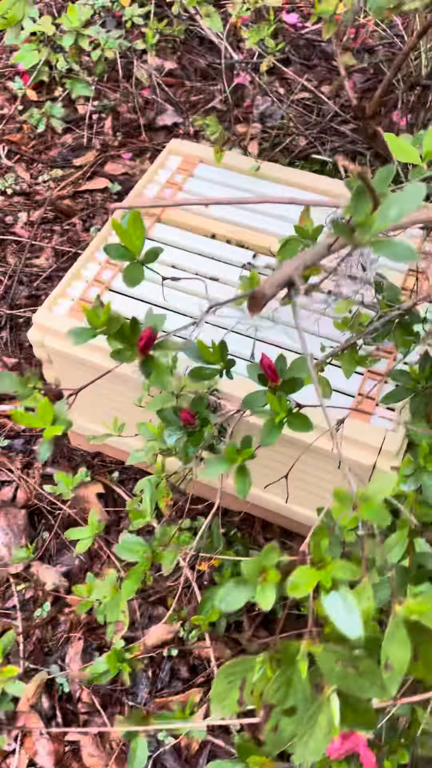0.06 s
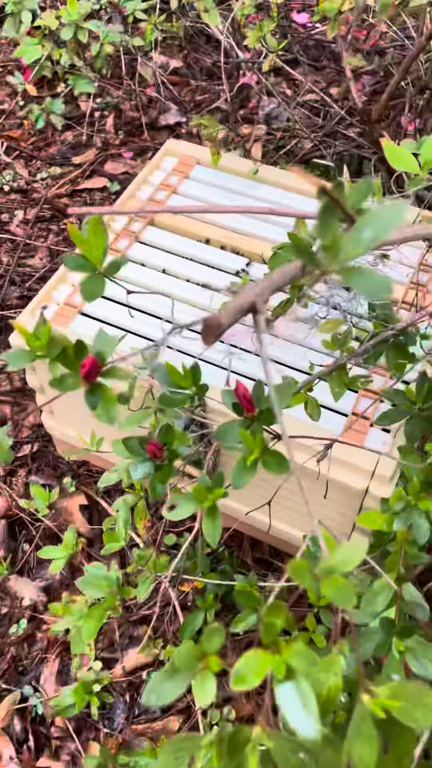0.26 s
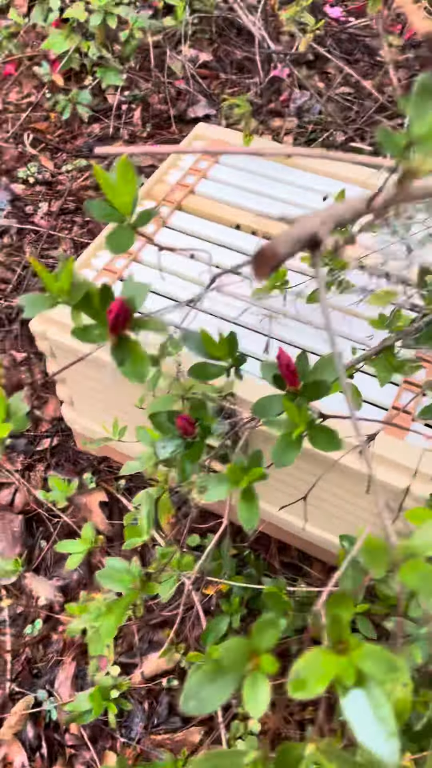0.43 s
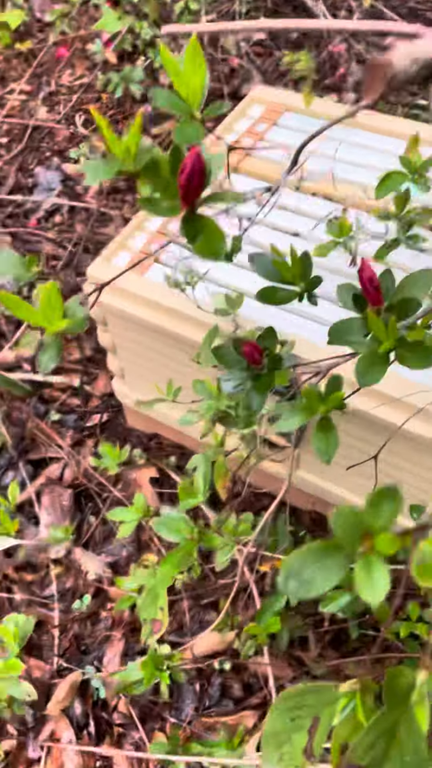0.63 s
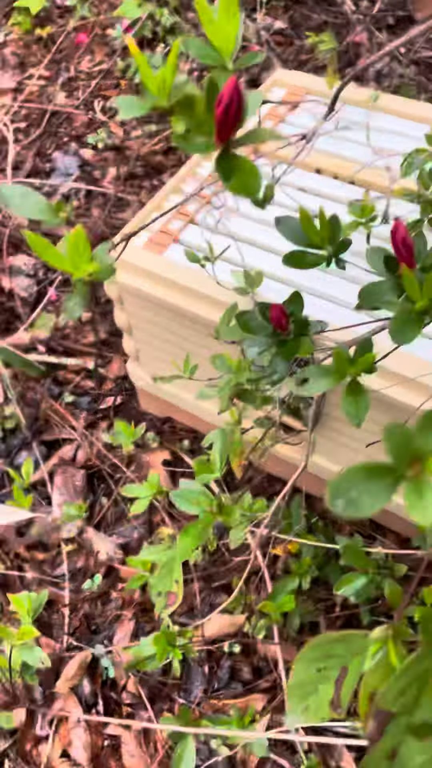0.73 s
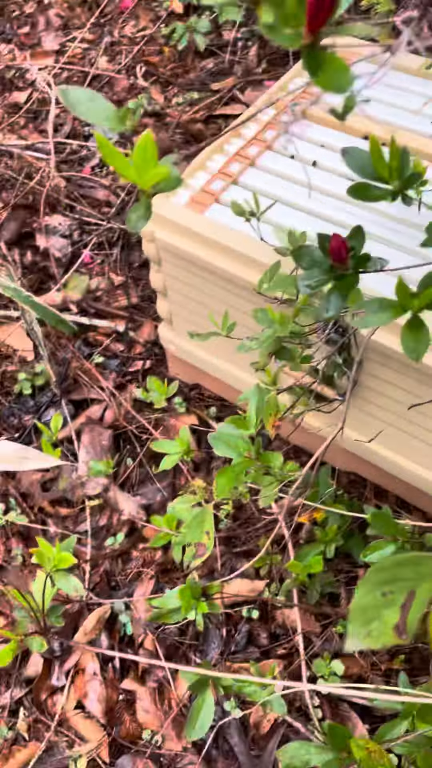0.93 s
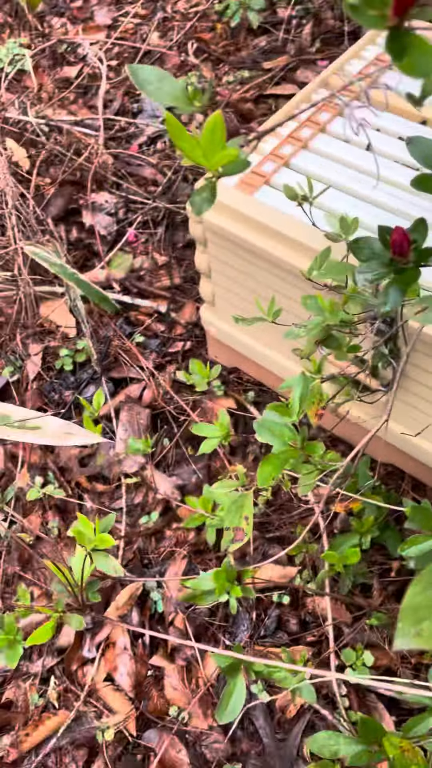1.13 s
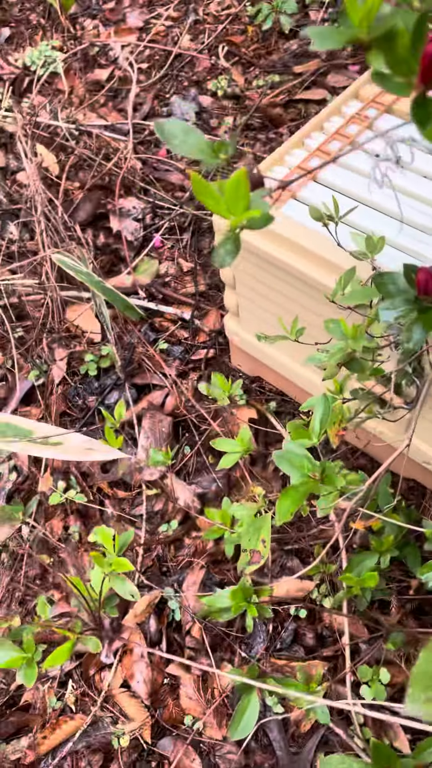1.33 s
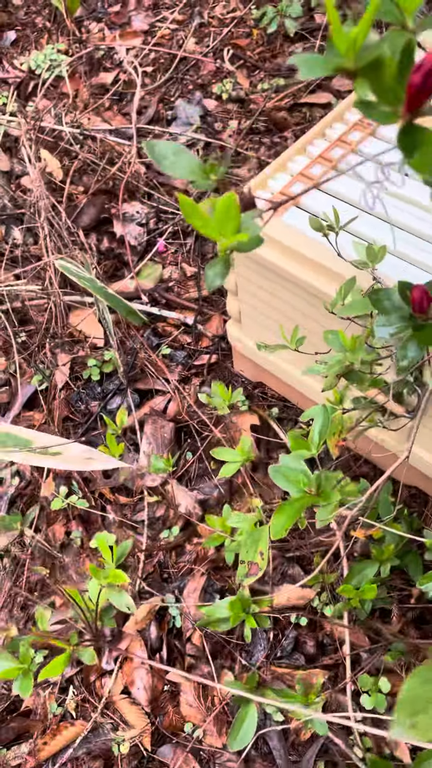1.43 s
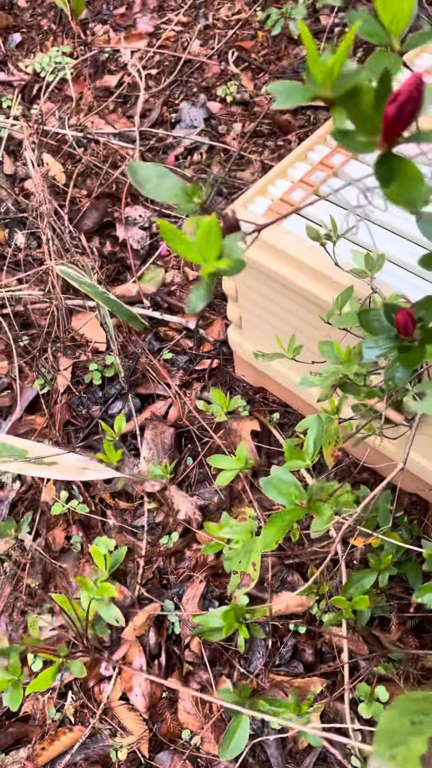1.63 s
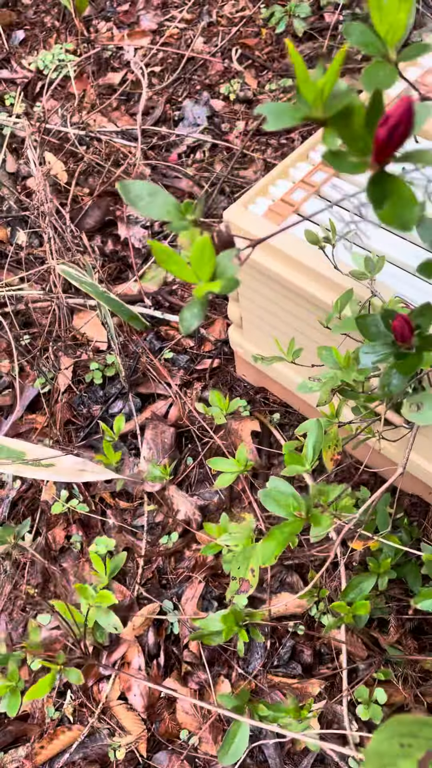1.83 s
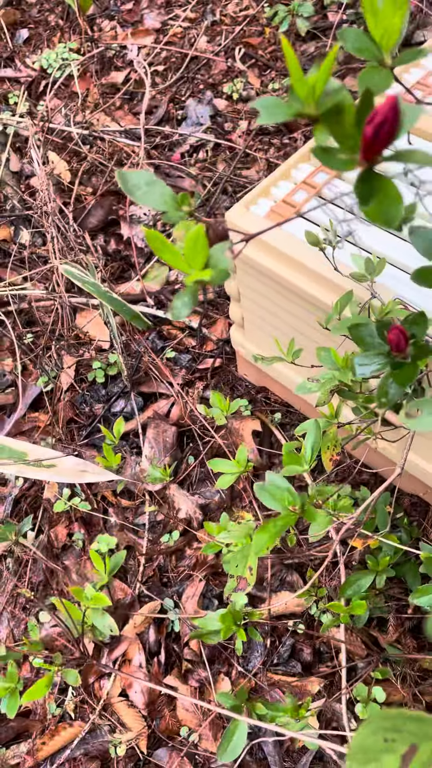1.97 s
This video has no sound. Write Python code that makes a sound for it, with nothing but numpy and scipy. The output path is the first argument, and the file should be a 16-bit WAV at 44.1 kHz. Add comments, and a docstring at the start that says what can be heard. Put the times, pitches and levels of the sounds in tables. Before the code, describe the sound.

Close stereo microphone in a shrubbery: quick, rough bee passes around 240 hertz, loudest before one second, over soft leaf hiss and tiny twig snaps. Hard clicking blows and air puffs come just after one second, then shorter buzzes and puffs. From three seconds it thins to distant swarm, rumble, soft bumps and thin bird slurs; a close wavering hover returns before a final battering at 5.3 seconds.

```python
"""Honeybees fly round a hive box in a shrubbery, among brushed leaves and snapping twigs.
At first one after another swoops past the microphone: each wingbeat hums, buzzes and slaps, swelling with nearness.
Just after one second, air puffs, knocks and wing tips hit the microphone hard; more passes and puffs follow.
From three seconds a far bird whistles short slurs; then bees hover close and weave, and at 5.3 s the blows return.
Under it all lie the hum of the swarm, the hiss of foliage and a low outdoor rumble with a wavering drone."""
import sys
import numpy as np
from scipy import signal
from scipy.fft import rfft, irfft, next_fast_len
from scipy.io import wavfile
from scipy.ndimage import map_coordinates

SR = 44100
rng = np.random.default_rng(int(sys.argv[2]) if len(sys.argv) > 2 else 0)


def generate_wav(signal):
    """Clip the signal to [-1, 1] and save it as 16-bit WAV at the path in sys.argv[1]."""
    frames = np.transpose(np.atleast_2d(signal))
    scaled = np.clip(frames, -1, 1) * 32767
    pcm = np.round(scaled).astype(np.int16)
    wavfile.write(sys.argv[1], SR, pcm)


N = 258293
T = np.arange(N) / SR  # time of every sample, seconds
FFT_SIZE = next_fast_len(N)
FREQS = np.arange(FFT_SIZE // 2 + 1) * SR / FFT_SIZE
LEFT_RIGHT = np.array([[1], [-1]])  # opposite signs for the two channels


def amp(db):
    """Turn decibels into gain."""
    return np.exp(np.asarray(db) * np.log(10) / 20)


def unit(x):
    """Scale to an rms level of 1."""
    return x / np.sqrt(np.mean(x ** 2))


def curves(table, t=T):
    """Join the columns of a table by straight lines in time."""
    s, *columns = np.transpose(table)
    return [np.interp(t, s, column) for column in columns]


def along_hz(points, hz=FREQS):
    """Join (Hz, value) points along a log-frequency axis."""
    f, value = np.transpose(points)
    return np.interp(np.log(hz + 1), np.log(f), value)


def colour(x, points):
    """Filter a sound by a list of (Hz, dB) points."""
    return irfft(rfft(x, FFT_SIZE) * amp(along_hz(points)), FFT_SIZE)[..., :N]


def walk(rate):
    """Random wandering: a new chance value `rate` times a second, joined by lines, with a spread near 1."""
    knots = np.arange(0, T[-1] + 1, 1 / rate)
    return np.interp(T, knots, rng.standard_normal(len(knots)))


def swell(s, length):
    """A bell-shaped rise and fall round time s."""
    return np.exp(-2 * ((T - s) / length) ** 2)


def spread(pair, side_db):
    """Use two unrelated signals as the middle and side of a stereo pair."""
    middle, side = pair
    return middle + amp(side_db) * side * LEFT_RIGHT


# Each row: start in seconds (middle of the pass), approach in seconds, linger in seconds,
# leave in seconds, wingbeat in Hz, slide of the wingbeat to either side in Hz,
# hum at the nearest point in dB, then octave, buzz and slap in dB over the hum (all before later trims),
# tilt of the buzz in dB per octave, strongest part of the buzz in Hz,
# and roughness of the flight (about 0.5 smooth, 1 or more rough).
BEE_PASSES = [ (0.104, 0.077, 0.097, .2, 243, -6, -46.5, -0.5, -5, -19, -17, 1094, 1.04),
              (0.303, 0.025, 0.018, .07, 240, 14.5, -30, -6.5, -11, -27.5, -5.5, 900, 1.01),
              (0.495, .035, 0.16, 0.018, 226, 2, -26.5, -4, -8, -28.5, -3.5, 748, 0.78),
              (0.619, 0.027, 0, 0.035, 235.1, -10.5, -12, 1.5, -5, -28, -2, 780, 0.78),
              (0.694, 0.025, 0.012, .019, 237.6, -8, -10, 0, -11, -36, 1.5, 703, 0.78),
              (0.769, 0.022, 0.0094, 0.015, 256.8, 9, -37, 1.5, 0.5, -16, -3, 796, 0.77),
              (0.905, 0.044, 0.0088, .1, 231, 3, -27.5, -12.5, -13.5, -36, -3, 990, 1.25),
              (1.027, 0.072, 0.062, .09, 253.8, 2, -34, 3.5, -7, -29, 1.5, 1200, 1.03),
              (1.125, 0.044, 0.008, 0.031, 240.8, 5, -21.5, -0.5, -3.5, -26, -4, 730, 0.88),
              (1.289, 0.037, 0.015, .014, 247.8, 0, -22, -2.5, -4, -21.5, 1, 690, 0.74),
              (1.308, 0.0062, 0.014, 0.0071, 246.8, 0.5, -10, -8, -3.5, -21.5, 1.5, 1010, 0.73),
              (1.58, 0.042, 0.25, 0.12, 235.2, 1, -46, -7.5, -4.5, -6.5, -10, 1080, 0.93),
              (1.828, 0.06, 0, 0.0418, 245, 8, -34, -13, -4.5, -20.5, 1, 1090, 0.77),
              (1.913, 0.024, 0.0021, 0.016, 241.2, -2, -25, -8, -8.5, -21.5, 3.5, 1030, 1),
              (1.969, 0.0056, 0.012, 0.055, 252.9, -3, -35, -0.5, 1, -15, -4, 940, 0.79),
              (2.076, 0.036, 0, 0.022, 259.2, 3, -27, -5.5, -5.5, -20, 0, 845, 0.91),
              (2.116, .012, 0.012, 0.023, 243.1, -3.5, -22.5, -3, -5.5, -22.5, -1.5, 900, 1.06),
              (2.222, 0.0478, 0.0058, 0.069, 226.9, -3, -36, -7, -3, -21.5, -2, 1190, 0.68),
              (2.298, 0.014, 0.009, 0.014, 230, 7, -24.5, -0.5, 0.5, -19.5, 4.5, 1200, 0.65),
              (2.35, 0.031, 0.023, 0.024, 252.5, 9, -42.5, -16, 7.5, -6.5, 1.5, 1060, 0.72),
              (2.405, 0.025, 0.044, 0.029, 257, -3.5, -42.5, -10, 5.5, -8.5, 0.5, 1060, 0.87),
              (2.492, 0.028, 0, 0.026, 252.5, -8, -33, 2, 6.5, -11.5, 2, 815, 0.86),
              (2.765, 0.066, 0.04, .034, 247, -4, -31.5, -6, -8.5, -21.5, 5.5, 1140, 0.69),
              (3.147, 0.044, 0.049, 0.027, 243, -4, -44, -6, -8, -10, 4, 1190, 0.8),
              (4.411, .05, 0.00052, 0.051, 250, -6, -41, -1.5, -5, -23, 1, 1120, .5),
              (4.781, .046, 0.0079, 0.11, 244.3, -4, -39, 4, -5, -22, 6, 1200, .5),
              (4.9, .036, 0.079, 0.025, 227.2, 0, -22.5, -3, -8.5, -24, 4.5, 1090, 0.79),
              (5.005, .025, .065, 0.035, 227.4, 0, -22, -4.5, -8.5, -28.5, 3.5, 1160, 0.55),
              (5.119, 0.04, 0.095, 0.016, 241.5, 2, -22, -4.5, -12, -30.5, -0.5, 1080, 0.5),
              (5.222, 0.026, 0.02, 0.022, 236.2, -5, -30, 8, 5, -19, -1.5, 750, 0.77),
              (5.316, 0.0073, 0.014, 0.0075, 244.1, -5.5, -17, -0.5, 1, -20.5, 0, 910, 0.82),
              (5.356, 0.063, 0.052, 0.013, 240.5, -0.5, -27, 2.5, -5.5, -20, -5, 820, .95)]
# The powers of distance with which hum, octave, buzz and slap fade, in that order (no unit).
DISTANCE_POWERS = [3.0, 2.88, 2.5, 1.4]
# How the long hovers weave about their pitch. Each row: time in seconds, shift of the wingbeat in Hz.
HOVER_WEAVE = [(.36, 0), (.39, 5), (.425, -7), (.46, 2), (.5, 0), (4.62, 0), (4.68, 8.5), (4.746, -5.5),
               (4.79, -0.5), (4.825, 6.5), (4.888, -8.5), (4.928, 6), (4.972, -10.5), (5.03, 3.5),
               (5.08, -0.5), (5.145, 2), (5.17, -0.5), (5.2, -0.5)]
SLIDE_S = 0.02  # added to half the linger to set how fast the wingbeat slides


def flight():
    """Passes swell and fade with distance; the nearest bee sets the wingbeat, buzz colour and roughness."""
    power, steer = np.zeros((4, N)), np.zeros((4, N))
    for (s, approach, linger, leave, hz, slide_hz, hum_db, octave_db, buzz_db, slap_db,
         tilt_db, focus_hz, rough) in BEE_PASSES:
        t = T - s
        coming = np.minimum(t + linger / 2, 0) / approach
        going = np.maximum(t - linger / 2, 0) / leave
        distance_db = 10 * np.log10(1 + (coming + going) ** 2)
        over_hum = [0, octave_db, buzz_db, slap_db]
        layers = [amp(hum_db + db - fall * distance_db) ** 2 for db, fall in zip(over_hum, DISTANCE_POWERS)]
        power += layers
        pitch = hz + slide_hz * np.tanh(t / (linger / 2 + SLIDE_S))
        # the louder the hum of a bee, the more it decides
        steer += [layers[0] * value for value in (pitch, tilt_db, focus_hz, rough)]
    wingbeat_hz, tilt, focus_hz, roughness = steer / power[0]
    focus = focus_hz / wingbeat_hz  # as a multiple of the wingbeat
    return wingbeat_hz + curves(HOVER_WEAVE)[0], np.sqrt(power), tilt, focus, roughness


FOCUS_DB, FOCUS_OCTAVES = 4.5, 0.24  # height and half-width of the strongest part of the buzz
# echo off the hive box: strength, then delay and sway of the delay in wingbeats
ECHO_SHARE, ECHO_BEATS, ECHO_SWAY = 0.33, 0.3, 0.09


def partials(phase, shape, turn_db, tilt_db=0, focus=None, sweep=3.29, turn_rate=28,
             echo_turns=0.14, box_lag=None):
    """Wingbeat harmonics near rms 1: highs come first, reflections make each waver, the box echo cuts notches."""
    multiple, db = np.transpose(shape)
    tone, power = 0, 0
    for k in np.arange(round(multiple[0]), round(multiple[-1]) + 1):
        focus_db = 0
        if focus is not None:
            focus_db = FOCUS_DB * np.exp(-(np.log2(k / focus) / FOCUS_OCTAVES) ** 2)
        gain = amp(np.interp(k, multiple, db) + tilt_db * np.log2(k) + focus_db)
        if box_lag is not None:
            gain = gain * (1 + ECHO_SHARE * np.cos(2 * np.pi * k * box_lag))
        shift = 2 * np.pi * echo_turns * walk(turn_rate) - sweep * np.log(k)
        tone = tone + gain * amp(turn_db * walk(turn_rate)) * np.cos(k * phase + shift)
        power = power + gain ** 2 / 2
    return tone / np.sqrt(power)


def stroke(phase, sharpness):
    """A gate that opens once per wingbeat."""
    return unit(np.exp(sharpness * (np.cos(phase) - 1)))


# The harmonics of the buzz. Each row: multiple of the wingbeat, relative level in dB before tilt and focus.
BUZZ_PARTIALS = [(3, 2), (4, -1.5), (5, -0.5), (6, -4), (7, -9.5), (8, -17.5), (9, -27)]
# The harmonics of the slap. Each row: multiple of the wingbeat, relative level in dB.
SLAP_PARTIALS = [(9, -4), (10, -5.5), (12, -9), (14, -15), (17, -12), (21, -13.5), (24, -7.5), (28, -22)]


def near_bee(phase, levels, tilt, focus, roughness, buzz_db=-1.5, slap_db=-5.0, swish_db=-7,
             eddy_db=-6.5, bob_db=2.0):
    """Lift hums, the wing's turn buzzes and slaps, and the air it stirs swishes once a beat."""
    lift, octave, buzz, slap = levels
    # the slap fades more slowly than the hum, and its very faintest part is pushed down further
    slap = slap ** 2 / (slap + amp(-59.5))
    # no two strokes are alike in timing or force
    rough = np.clip(roughness, .4, 1)
    phase = phase + .085 * rough * walk(220)
    force = amp(rough * (1.8 * walk(200) + 1.6 * walk(55)))

    swish = unit(colour(rng.standard_normal(N), [
        (800, -23.0), (2000, 9.5), (3200, -27.0), (5300, 2.0), (7500, -55.0), (12000, -50.0)]))
    eddies = unit(colour(rng.standard_normal(N), [
        (40, -12.0), (150, 3.5), (600, 2.0), (1500, 0.5), (2200, -29.0), (3200, -26.5), (8000, -47.5)]))

    waver_db = 1.8 * rough ** 2
    hum = lift * partials(phase, [(1, 0)], turn_db=waver_db, echo_turns=.12 * rough ** 2)
    hum = hum + octave * partials(phase, [(2, 0)], turn_db=waver_db, echo_turns=.17 * rough ** 2)

    box_lag = ECHO_BEATS + ECHO_SWAY * walk(9)
    buzzing = partials(phase, BUZZ_PARTIALS, turn_db=3.8 * rough, tilt_db=tilt, focus=focus,
                       turn_rate=40, echo_turns=.2 * rough ** 2, box_lag=box_lag)
    slapping = partials(phase, SLAP_PARTIALS, turn_db=3, turn_rate=50, echo_turns=0.15 * rough ** 2)
    rasp = (buzz * amp(buzz_db) * buzzing
            + slap * amp(slap_db) * slapping
            + slap * amp(swish_db) * swish * stroke(phase, sharpness=30.0)
            + buzz * rough ** 2 * amp(eddy_db) * eddies * stroke(phase, sharpness=0.49))
    # the bee bobs nearer and further as it manoeuvres
    bob = amp(bob_db * rough ** 2 * walk(38))
    return bob * (hum * np.sqrt(force) + rasp * force)


# A second bee glides by behind the nearest. Each row: middle in seconds, level in dB, length in seconds,
# wingbeat in Hz, glide in Hz per second, tilt in dB per octave.
SECOND_BEE = [(0.255, -41, 0.042, 236.3, -330, 0), (0.401, -38, 0.03, 237.8, -250, -3),
              (0.955, -32.5, 0.042, 241.7, -200, -2.5), (1.052, -38.5, 0.036, 225.6, 156, 1.5),
              (1.107, -35, .025, 255.7, -200, -6.5), (1.215, -42, 0.032, 232, 198, 2.5),
              (1.741, -47.5, 0.0448, 239.2, -100, 0), (1.986, -42, 0.037, 264.9, -220, 0),
              (2.062, -37, .028, 237.8, -200, 4.5), (2.441, -34.5, .026, 240.9, -450, 2),
              (2.958, -57, 0.093, 228.3, -91, -23), (3.113, -47, 0.041, 278.7, -130, -5),
              (3.251, -54.5, 0.0505, 244.3, 40, 1), (3.395, -53, 0.049, 255.8, 123.5, -1),
              (3.894, -57, 0.081, 247.9, -86.5, 8), (4.46, -51, 0.033, 239.8, -300, 1)]


def crossings():
    """A second bee slides through the pitch of the first and beats against it."""
    power, pitch, tilt = 0, 0, 0
    for s, db, length, hz, glide_hz_per_s, tilt_db in SECOND_BEE:
        near = (amp(db) / (1 + ((T - s) / length) ** 4)) ** 2
        power = power + near
        pitch = pitch + near * (hz + glide_hz_per_s * np.clip(T - s, -length, length))
        tilt = tilt + near * tilt_db
    phase = 2 * np.pi * np.cumsum(pitch / power + 3.5 * walk(60)) / SR
    shape = [(1, 4.0), (2, 6.5), (3, -1), (4, -4), (5, -6), (6, -7.5), (8, -16)]  # (multiple, dB)
    return np.sqrt(power) * partials(phase, shape, turn_db=2.5, tilt_db=tilt / power)


# Air blown onto the microphone. Each row: middle in seconds, level in dB, length in seconds,
# upper edge at the middle in Hz.
AIR_PUFFS = [(0.728, -27.5, 0.021, 192.5), (0.786, -31.5, 0.046, 190), (1.321, -14, 0.011, 450),
             (1.35, -25, 0.033, 85.2), (1.384, -30, 0.025, 173.4), (1.928, -33.5, 0.017, 377),
             (2.114, -23.5, 0.019, 1009), (2.142, -24.5, 0.021, 403), (2.494, -28.5, 0.017, 1104),
             (2.52, -25, 0.019, 338), (2.97, -52, .12, 420), (3.621, -30.5, 0.027, 177.1),
             (3.645, -37.5, 0.012, 597), (3.931, -37, 0.03, 149.8), (4.075, -40.5, 0.056, 256.8),
             (4.219, -32.5, 0.029, 275.8), (4.281, -33, .012, 397.3), (4.15, -44.5, 0.21, 199.3),
             (4.304, -31, 0.032, 128.8), (4.417, -35.5, 0.053, 222), (5.227, -29.5, 0.042, 139),
             (5.33, -16, 0.014, 1103), (5.349, -17, 0.035, 120.1), (5.353, -24.5, 0.025, 1280),
             (5.389, -20.5, 0.0098, 794.5)]


def puffs(low_hz=48, fall_octaves=.4, flutter_db=4):
    """Air buffets the microphone; faster air reaches higher, and each puff sinks as it slows."""
    out = np.zeros(N)
    flutter = amp(flutter_db * walk(120))
    for s, db, length, edge_hz in AIR_PUFFS:
        near = np.abs(T - s) < 2 * length
        shape = swell(s, length)[near]
        edge = edge_hz * 2 ** (-fall_octaves * (T[near] - s) / length)
        # smooth noise read faster or slower moves its upper edge
        smooth = signal.butter(3, 1 / 8, output="sos")
        eddies = signal.sosfilt(smooth, rng.standard_normal(8192))
        air = map_coordinates(eddies, [100 + 16 * np.cumsum(edge) / SR], mode="mirror")
        air = signal.sosfilt(signal.butter(4, low_hz, "high", fs=SR, output="sos"), air)
        out[near] += amp(db) * unit(air * shape * flutter[near]) * np.sqrt(np.mean(shape ** 2))
    return out


# Single hard eddies knocking on the microphone. Each row: start in seconds, envelope peak in dB,
# starting pitch in Hz.
EDDY_KNOCKS = [(1.304, 2, 835), (1.313, -6, 430), (1.3184, -9.5, 480), (1.325, -17, 74.6),
               (1.341, -21, 134), (1.381, -26, 121), (2.112, -6.5, 1010), (2.49, -17, 890),
               (3.636, -32, 340), (3.943, -35.5, 422), (4.098, -31.5, 343), (4.208, -29, 190),
               (4.219, -38, 452), (4.2745, -36, 480), (4.283, -34, 393), (4.412, -24, 282.6),
               (5.3188, -6.5, 744), (5.3222, -1.5, 647), (5.327, -4.5, 310), (5.344, -9.5, 496),
               (5.355, -11, 342), (5.3612, -10, 507), (5.368, -18.5, 227), (5.385, -21, 698.8),
               (5.393, -14.5, 278), (5.406, -26, 102)]


def knocks(rise_cycles=0.53, slowing=0.25):
    """A hard eddy swings the pressure a few times, each swing slower than the last."""
    out = np.zeros(N)
    for s, db, hz in EDDY_KNOCKS:
        now = (T > s) & (T < s + 10 / hz)
        cycles = hz * (T[now] - s)
        rise = cycles / rise_cycles
        swing = np.sin(2 * np.pi * np.log1p(slowing * cycles) / slowing)
        out[now] += amp(db) * rise * np.exp(1 - rise) * swing
    return out


# Wing tips strike the microphone once a beat. Each row: start in seconds, level in dB (each hit varies
# a little), length of the run in seconds, wingbeat in Hz.
WING_STRIKES = [(1.3032, -3, .0105, 243), (5.3078, -6, .015, 235)]
# The colour of a strike. Each row: frequency in Hz, relative level in dB.
STRIKE_SPECTRUM = [(200, -4), (1000, 2), (2500, -6), (3500, -17), (5500, -15), (7000, -38), (12000, -55)]


def strikes(rebound=0.67, rebound_s=0.00025, scatter_db=0.5):
    """A few hard cracks in a row: each wing tip hits and springs back."""
    hits = np.zeros(N)
    for s, db, length, hz in WING_STRIKES:
        times = s + np.arange(0, length, 1 / hz)
        for at, (force, delay) in zip(times, rng.uniform(-1, 1, (20, 2))):
            size = amp(db + scatter_db * force)
            hits[int(at * SR)] -= size
            # the delay of the rebound varies from half to double
            hits[int((at + rebound_s * 2 ** delay) * SR)] += rebound * size
    return colour(hits, STRIKE_SPECTRUM) / np.mean(amp(along_hz(STRIKE_SPECTRUM)))


# Wings brushing leaves. Each row: middle in seconds, level in dB, length in seconds.
LEAF_BRUSHES = [(0.09, -59, 0.064), (0.846, -57, 0.035), (4.853, -41.5, 0.0049), (4.917, -38, 0.025),
                (4.948, -46, 0.022), (5.546, -53.5, 0.049)]


def brushes(phase):
    """Wing tips tick against a leaf at every stroke."""
    touch = sum(amp(db) * swell(s, length) for s, db, length in LEAF_BRUSHES)
    ticks = unit(colour(rng.standard_normal((2, N)), [
        (1500, -26.0), (4000, -5.0), (5600, 2.0), (10500, -2.0), (16000, 5.5)]))
    return spread(ticks, side_db=1.5) * touch * stroke(phase, sharpness=0.98)


# Dry twigs snapping. Each row: start in seconds, crack level in dB before its colour,
# woody ring in dB over that (before a shared trim), time for the crack to fall 60 dB in seconds.
TWIG_SNAPS = [(0.016, -16.5, -28, 0.0075), (0.0221, -19.5, -12.5, 0.01), (0.151, -25, -17, 0.0041),
              (0.201, -30, -19, 0.0067), (.279, -27, -19, 0.01), (.310, -23.5, -28.5, 0.008),
              (1.5612, -12.5, -24, 0.0059), (2.5951, -46, -12, 0.0065), (3.415, -38, -24, 0.0076),
              (3.6791, -25.5, 0, 0.096), (3.89, -46, -8, 0.006)]
# What a twig rings with. Each row: pitch in Hz, relative level in dB, time to fall 60 dB in seconds.
TWIG_RING = [(1260, 0, 0.032), (1750, -7.5, 0.081), (2220, -1.5, 0.027), (2400, 0, 0.022),
             (3720, -10, 0.019), (4490, -5, 0.02), (5680, 10, 0.0039), (7100, -3.5, 0.0059),
             (9300, -0.5, 0.011), (10800, 1.5, 0.0045)]
# The colour of the crack. Each row: frequency in Hz, gain in dB.
CRACK_SPECTRUM = [(500, -16), (2000, -14), (4200, -3.5), (7300, -29.5), (10200, -9.5), (13000, -23),
                  (16000, -17)]


def snaps(tail_db=-23, tail_t60=0.087, ring_db=-4):
    """A fibre cracks, the twig rings, and the shrubs scatter a short tail."""
    cracks, rings = np.zeros((2, N)), np.zeros(N)
    t = T[:SR // 5]
    ring = 0
    for k, (hz, db, t60) in enumerate(TWIG_RING):
        # every other tone starts downwards
        ring = ring + amp(db - 60 * t / t60) * np.sin(2 * np.pi * hz * t) * (-1) ** k
    for s, db, woody_db, t60 in TWIG_SNAPS:
        start = int(s * SR)
        decay = amp(-60 * t / t60) + amp(tail_db - 60 * t / tail_t60)
        cracks[:, start:start + len(t)] += amp(db) * decay * rng.standard_normal((2, len(t)))
        rings[start:start + len(t)] += amp(db + woody_db + ring_db) * ring
    return spread(colour(cracks, CRACK_SPECTRUM), side_db=2.5) + rings


# The level of the rest of the swarm. Each row: time in seconds, level in dB.
SWARM_LEVEL = [(0, -49.5), (.75, -54), (1.05, -48), (1.45, -51.5), (2.05, -48.5), (2.55, -57), (3.85, -54),
               (5.85, -57.5)]


def swarm(count=9, centre_hz=246, passing_db=5):
    """Bees further off, each with its own drifting wingbeat and level."""
    cycle = np.linspace(0, 2 * np.pi, 1024)
    shape = [(240, 3.0), (490, 3), (740, -7.5), (1000, -5.5), (1250, -2.0), (1700, -6.5),
             (2200, -10.0), (3500, -12.5)]  # (Hz, dB)
    orders = np.arange(1, 15)
    gains = amp(along_hz(shape, orders * centre_hz))
    out = 0
    for _ in range(count):
        # one wingbeat as a wave, then read at the drifting pitch
        starts = rng.uniform(0, 2 * np.pi, (len(orders), 1))
        beat = gains @ np.cos(np.outer(orders, cycle) + starts)
        hz = centre_hz + 22 * walk(7) + 6 * walk(45)
        phase = 2 * np.pi * (np.cumsum(hz) / SR % 1)
        bee = np.interp(phase, cycle, beat) * amp(passing_db * walk(3.9))
        out = out + bee * amp(rng.uniform(-0.54, 2) * LEFT_RIGHT)
    return unit(out) * amp(curves(SWARM_LEVEL)[0])


# A far bird. Each row: start in seconds, level in dB before flicker and scatter, start pitch in Hz,
# end pitch in Hz, length in seconds.
BIRD_CHIRPS = [(3.035, -63, 4200, 3395, 0.024), (3.239, -60, 4570, 3400, 0.035),
               (3.458, -57, 4680, 3484, 0.027), (3.824, -62, 3100, 2963, 0.032),
               (3.863, -55.5, 3050, 2900, 0.014), (3.884, -58, 4670, 3335, 0.039),
               (4.041, -56, 2930, 2960, 0.022), (4.107, -57.5, 4650, 3440, 0.024),
               (4.158, -63, 3020, 2950, 0.02), (4.254, -61, 2942, 3055, 0.037),
               (4.327, -60, 4650, 3450, 0.039), (4.424, -64, 2650, 2840, 0.025),
               (4.484, -64, 3000, 2866, 0.025), (4.564, -57, 4500, 3570, 0.018),
               (4.606, -66, 2440, 2430, 0.024), (4.659, -62, 2500, 2418, 0.025)]


def bird(waver_hz=45, scatter_db=-10, scatter_t60=0.16):
    """Short wavering whistles, quick falling slurs with level pips between them, blurred by the trees."""
    out = np.zeros(N)
    waver, flicker = waver_hz * walk(260), amp(1.5 + 2 * walk(200))
    for s, db, start_hz, end_hz, length in BIRD_CHIRPS:
        now = (T > s) & (T < s + length)
        u = (T[now] - s) / length
        hz = start_hz + (end_hz - start_hz) * u ** 1.1 + waver[now]
        whistle = np.sin(2 * np.pi * np.cumsum(hz) / SR)
        out[now] += amp(db) * flicker[now] * np.sin(np.pi * u) * whistle
    t = T[:SR // 5]
    trees = rng.standard_normal(len(t)) * amp(-60 * t / scatter_t60)
    blur = signal.fftconvolve(out, trees / np.linalg.norm(trees))[:N]
    return out + amp(scatter_db) * blur


# The level of the low rumble. Each row: time in seconds, level in dB before the drone is added.
RUMBLE_LEVEL = [(0, -42.5), (1.05, -38), (1.4, -45), (2.7, -50), (3.35, -42), (3.8, -43.5), (4.28, -40.5),
                (4.65, -46.5), (5.85, -53)]
# The colours of rumble and foliage hiss. Each row: frequency in Hz, relative level in dB per Hz.
RUMBLE_SPECTRUM = [(20, -38.5), (40, -17.5), (55, 2), (68, 2.5), (80, 2.5), (95, 4), (125, -12.5),
                   (200, -23), (500, -73.5)]
RUSTLE_SPECTRUM = [(30, 10), (150, 15.5), (400, 12.5), (1000, 9), (2000, -2), (3000, -2.5), (5000, 0),
                   (7000, -16.5), (11000, -5.5), (16000, -22)]
# The foliage stirs. Each row: middle in seconds, level in dB before a shared lift, length in seconds.
FOLIAGE_STIRS = [(0.05, -52.5, 0.3), (0.952, -55.5, 0.16), (1.545, -68.5, 0.45), (2.418, -58.5, 0.11),
                 (2.751, -59, 0.1), (4.958, -52.5, .17)]
RUSTLE_DB = -59  # foliage at rest, before the same lift


def outdoors(drone_db=-3, drone_hz=69, rustle_db=2, grain_db=2.0):
    """A low rumble with a wavering drone, alike in both ears, and the wide, grainy hiss of foliage."""
    drone = np.sin(2 * np.pi * np.cumsum(drone_hz + 3 * walk(9)) / SR)
    drone = drone * amp(drone_db + 1.7 * walk(13))
    rumble = unit(colour(rng.standard_normal(N), RUMBLE_SPECTRUM)) + drone
    rumble = rumble * amp(curves(RUMBLE_LEVEL)[0])

    grain = amp(grain_db * walk(400) + walk(14))
    middle, side = unit(colour(rng.standard_normal((2, N)) * grain, RUSTLE_SPECTRUM))
    side = colour(side, [(200, -9.0), (1500, -1.5), (2600, 5.0), (5000, -4), (15000, 0)])
    stirring = amp(RUSTLE_DB) + sum(amp(db) * swell(s, length) for s, db, length in FOLIAGE_STIRS)
    return rumble + spread((middle, side), side_db=1) * stirring * amp(rustle_db)


# How far the left port of the microphone leads the right. Each row: frequency in Hz, lead in radians.
PORT_LEAD = [(40, 0), (120, -0.26), (250, -0.38), (500, -0.36), (1000, -0.28), (1800, 0.2), (4000, 0.47),
             (7000, 3.4)]
WANDER = 0.00781  # share by which the wingbeat strays at roughness 1


def scene():
    """The close sounds reach the two ports out of step; everything else lies round them."""
    wingbeat_hz, levels, tilt, focus, roughness = flight()
    flutter = .01 * roughness * walk(70)
    hz = wingbeat_hz * (1 + flutter + WANDER * roughness ** 2 * walk(24))
    phase = 2 * np.pi * np.cumsum(hz) / SR
    bees = near_bee(phase, levels, tilt, focus, roughness) + crossings()
    close = bees + puffs() + knocks() + strikes()
    # half the lead goes to each port, with opposite signs
    lead = np.exp(.5j * along_hz(PORT_LEAD) * LEFT_RIGHT)
    close = irfft(rfft(close, FFT_SIZE) * lead, FFT_SIZE)[:, :N]
    return close + brushes(phase) + snaps() + swarm() + bird() + outdoors()


TOP_HZ = 16000  # nothing much is left above this


def record(dry):
    """Round off the loudest peaks, then cut the top of the treble with a steep low-pass."""
    rounded = dry / (1 + dry ** 6) ** (1 / 6)
    return signal.sosfilt(signal.ellip(8, .2, 70, TOP_HZ, fs=SR, output="sos"), rounded)


dry = scene()
out = record(dry)
generate_wav(out)
```